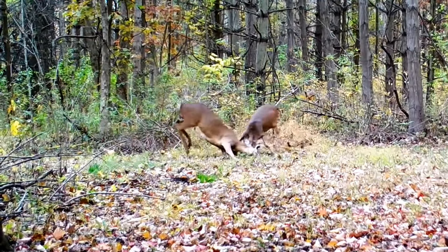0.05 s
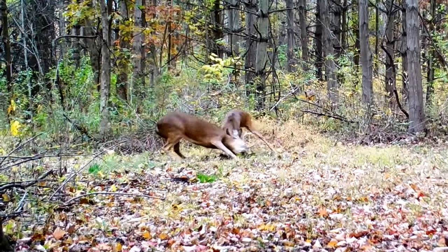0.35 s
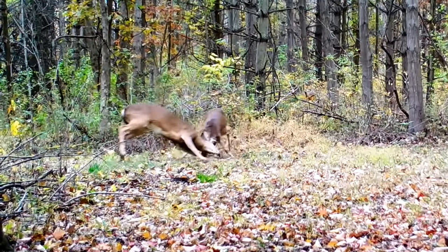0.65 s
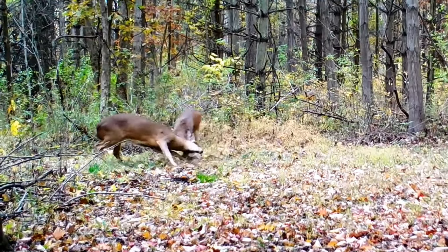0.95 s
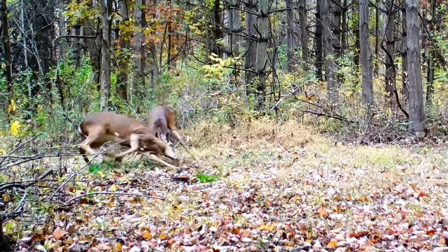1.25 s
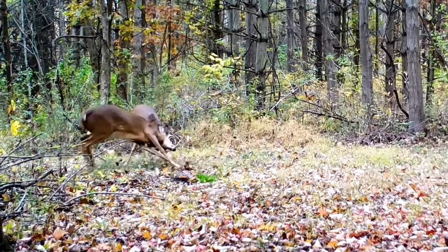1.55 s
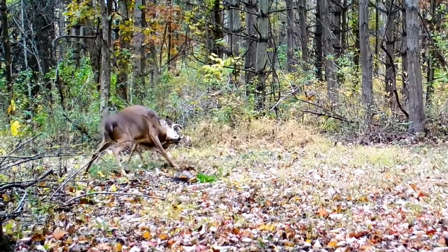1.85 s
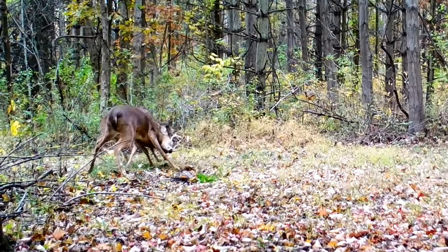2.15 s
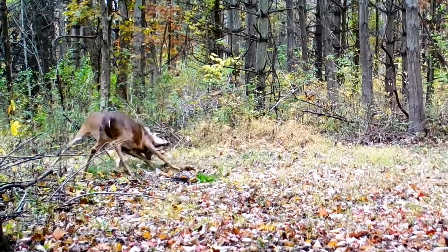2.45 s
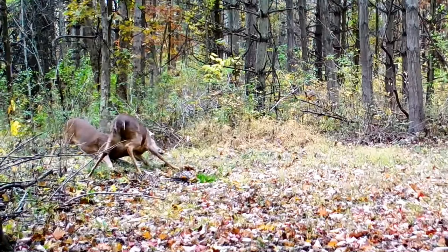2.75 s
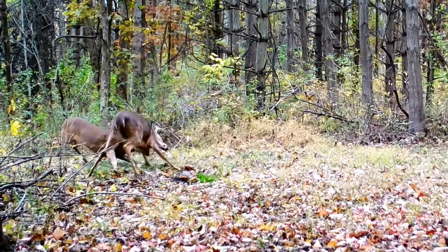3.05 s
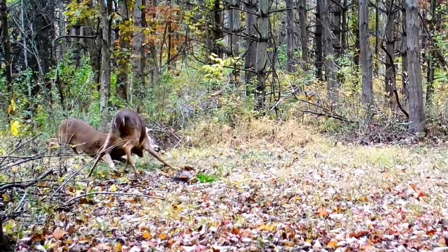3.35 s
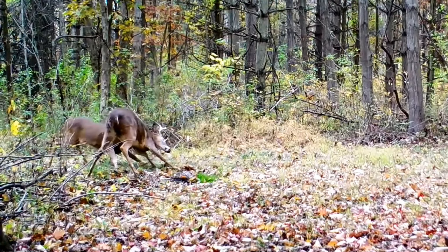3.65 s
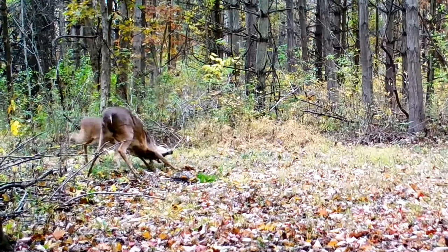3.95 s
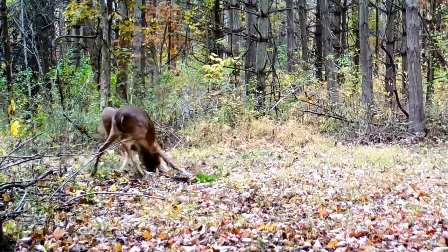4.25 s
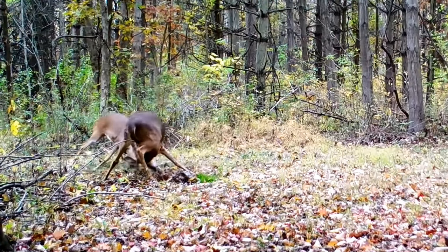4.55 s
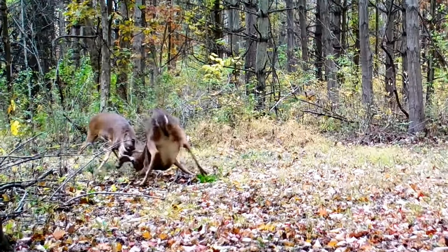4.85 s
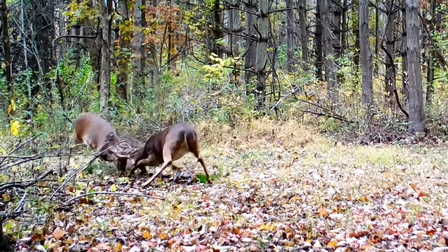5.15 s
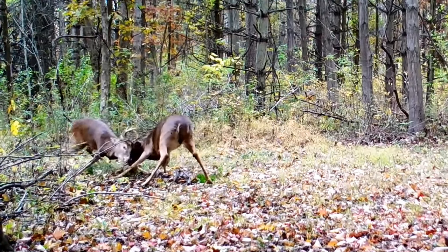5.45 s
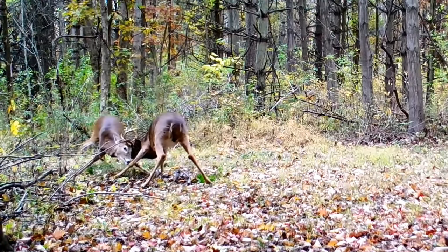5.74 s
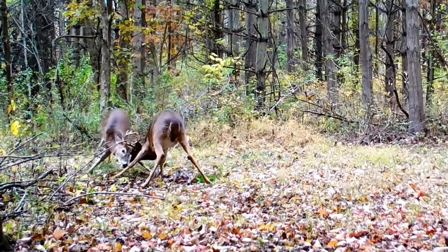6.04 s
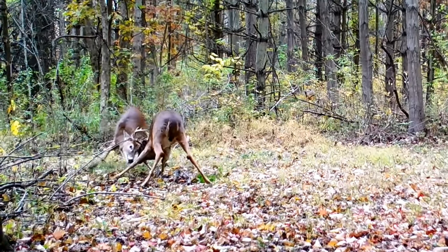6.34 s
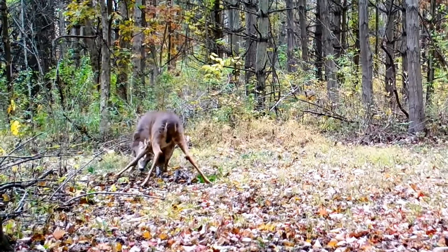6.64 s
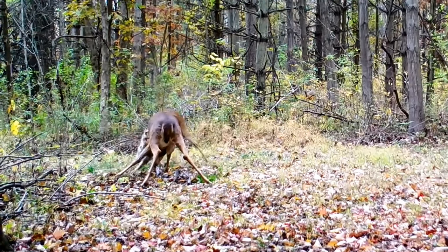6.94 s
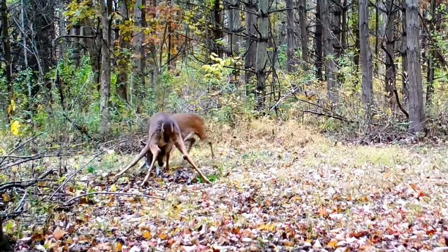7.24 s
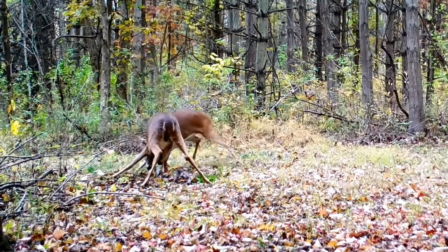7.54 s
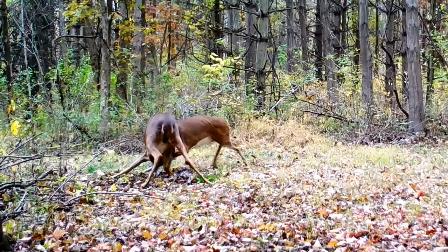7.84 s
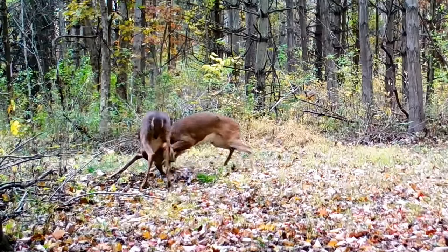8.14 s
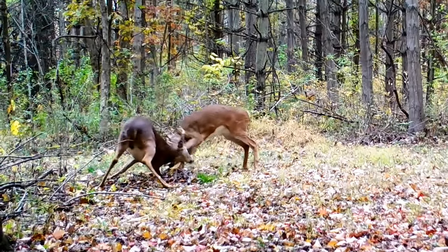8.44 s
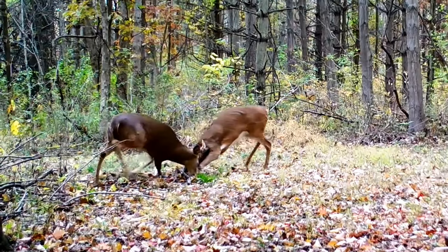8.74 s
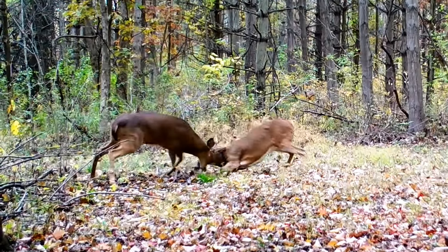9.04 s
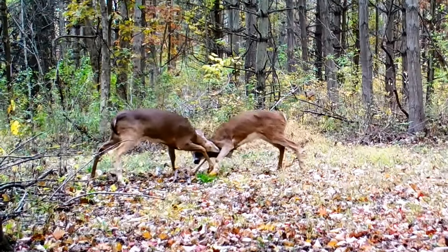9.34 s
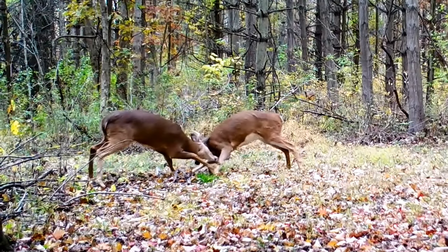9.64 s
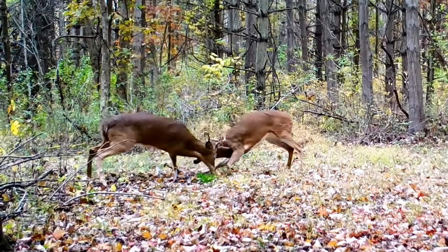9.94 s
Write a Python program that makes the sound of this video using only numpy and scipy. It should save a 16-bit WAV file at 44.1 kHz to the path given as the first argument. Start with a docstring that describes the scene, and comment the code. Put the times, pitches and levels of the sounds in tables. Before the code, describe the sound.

Dry leaves rustle and crunch continuously as two fighting deer shove each other in a wood. Hooves thump on soil and locked antlers tap and clack, breaking into a sharp flurry midway and another at the close. Behind them a far road rumbles, one engine fades and a lower hum grows. The microphone gives a dull sound with a faint hiss, and only the hardest knocks keep a bright snap.

```python
"""The edge of a quiet wood, where two bucks wrestle in dry leaves.
Their legs plough through the litter, hooves thud on the soil, and locked antlers clack in bursts,
with a faint echo off the trunks. Far off an engine drones and sinks in pitch, a lower hum joins it,
and traffic washes through the trees. The sound is muffled: treble falls away steeply, and only some
loud knocks keep a bright snap, over a faint hiss."""
import sys
import numpy as np
from scipy import signal
from scipy.fft import rfft, irfft, next_fast_len
from scipy.io import wavfile
from scipy.ndimage import uniform_filter1d, minimum_filter1d

SR = 44100
rng = np.random.default_rng(int(sys.argv[2]) if len(sys.argv) > 2 else 0)


def unload_wav(signal):
    """Save mono or channel-first audio to the path in sys.argv[1] as 16-bit WAV at rate SR, clipped to [-1, 1]."""
    wavfile.write(
        sys.argv[1],
        SR,
        np.round(np.clip(np.atleast_2d(signal).T, -1, 1) * 32767).astype(np.int16),
    )


N = 440559
TIME = np.arange(N) / SR

# All levels in the tables are relative.
# rumble of the far road: t/s, level/dB
ROAD_LEVEL = [(0, -28), (1.5, -27.5), (3, -28.5), (5.6, -29), (7.3, -28.5), (8.6, -28.5), (9.99, -27)]
# spectra of road rumble, tyre wash and dry leaves: f/Hz, level/dB
RUMBLE_SPECTRUM = [(12, -11), (24, -9), (42, 0.5), (58, 5), (78, 1), (105, 0.5), (135, -1.5), (170, -3),
                   (215, -11), (290, -16), (450, -24.5), (900, -49.5)]
TYRE_SPECTRUM = [(150, -24.5), (300, -10.5), (430, -6), (600, -2.5), (740, 0.5), (1100, -3), (1450, -10.5),
                 (2000, -15.5), (3200, -20), (5000, -27)]
LEAF_SPECTRUM = [(150, -4), (350, 0.5), (700, -7.5), (1200, 4), (1700, -1), (2300, 3.5), (2650, 0.5),
                 (3150, 4.5), (4000, -3), (6000, 0.5)]
# faint treble hiss with a few high peaks: f/Hz, level/dB
HISS_SPECTRUM = [(3000, -6), (5500, 0.5), (6900, -3), (7800, 5.5), (8500, -5.5), (10500, -8), (11700, 2),
                 (12600, -14), (14500, -18.5), (15600, -9)]
# the far engine fades as it moves off: t/s, fundamental level/dB, octave level/dB
ENGINE_LEVELS = [(0, -16, -18.5), (0.9, -20, -19), (1.8, -15.5, -23.5), (2.9, -15.7, -26.5),
                 (3.6, -15.5, -19.5), (4.3, -19.5, -27), (4.7, -16.5, -26.5), (5.2, -20, -30),
                 (6.1, -23, -24), (7.1, -21.5, -36), (8.1, -23, -40), (8.9, -29, -32), (9.99, -33.5, -32)]
# its sinking fundamental: t/s, f/Hz
ENGINE_GLIDE = [(0, 94.5), (2, 93.1), (4, 91.3), (6, 89.7), (8, 88.3), (10, 86)]
# hum of a second, lower engine: t/s, level/dB
HUM_LEVEL = [(0, -29), (1, -38), (3.5, -38.5), (4.7, -43), (5.2, -27.5), (6.7, -23.5), (7.4, -18.5),
             (8.6, -20), (9.99, -19)]
# feet never stop shuffling in the litter: t/s, level/dB
SHUFFLE_LEVEL = [(0, -34.5), (1.8, -35.5), (3, -38.5), (4, -37), (5, -30), (5.75, -43.5), (6.5, -38),
                 (7.4, -41), (8, -35), (9.99, -35)]
# a leg ploughs through the leaves: hardest push t/s, length/s, level/dB
LEG_SCUFFS = [(0.109, 0.12, -30.5), (0.326, 0.32, -31.5), (0.707, 0.22, -26.5), (0.915, .22, -28),
              (1.294, 0.4, -24), (1.578, .07, -22.5), (1.657, 0.18, -30.5), (2.1, .2, -37),
              (2.485, 0.11, -35.5), (2.732, .14, -30.5), (3.094, .07, -35), (4.375, .3, -28.5),
              (4.507, .07, -30), (4.679, 0.22, -30), (4.818, .17, -23.5), (5.201, 0.4, -29.5),
              (5.513, 0.2, -28.5), (6.68, 0.12, -31.5), (6.875, 0.088, -34.5), (7.101, 0.053, -30),
              (7.162, .08, -33), (7.808, .08, -29), (8.12, .25, -37.5), (8.348, 0.055, -30.5),
              (8.582, .08, -28.5), (8.717, 0.1, -28.5), (8.894, 0.12, -28.5), (9.03, .14, -27),
              (9.204, 0.12, -25.5), (9.33, .07, -28), (9.592, .14, -29.5), (9.912, 0.13, -25.5)]
# hooves stamp on soil: t/s, level/dB, f/Hz
HOOF_STAMPS = [(0.701, -16.5, 221), (1.144, -10, 300), (2.764, -16, 409), (2.824, -21, 222),
               (4.677, -16.5, 223), (4.766, -17, 270), (5.298, -18, 370), (7.084, -23.5, 294),
               (9.896, -17.5, 428), (9.911, -13.5, 510)]
# the soil rings under a hoof: ratio to the stamp's pitch, level/dB, t60/s
SOIL_RESONANCES = [(0.601, -2.5, 0.029), (1.0, 2, 0.027), (1.35, -8.5, 0.025)]
# the antlers ring: f/Hz, level/dB
ANTLER_RESONANCES = [(880, -7.5), (1270, -2.5), (1610, 1.5), (1900, 5), (2310, 2.5), (2590, -4), (2860, -1),
                     (3140, 3), (3540, 1), (3950, -8), (4490, 3.5)]
# antlers knock together: t/s, level/dB, favoured f/Hz, fall-off around it/(dB per octave), snap level/dB
ANTLER_CLACKS = [(0.313, -22.5, 2020, 11, -82), (1.132, -20.5, 2550, 5.5, -80),
                 (1.146, -10.5, 2400, 14, -77), (1.304, -20, 3400, 16, -80), (2.7576, -25, 1780, 12, -79),
                 (4.012, -20, 2140, 12, -86), (5.0915, -19.5, 2700, 11, -80),
                 (5.1373, -13.5, 2050, 17, -80), (5.16, -18, 2000, 10, -70), (5.1899, -7, 2460, 16, -21),
                 (5.222, -9.5, 2370, 16, -23), (5.241, -22, 2790, 12, -50), (5.2685, -9, 3250, 21, -25),
                 (5.276, -11, 2900, 7, -27), (5.2984, -12, 2640, -1, -34), (5.54, -19.5, 2310, 11, -76),
                 (6.6927, -22, 2550, 5.5, -72), (7.0838, -14, 3900, 3, -85), (7.0883, -19.5, 3900, 1, -84),
                 (7.7997, -19, 3200, 13.5, -80), (8.586, -25, 1740, 8, -80), (8.913, -24, 3040, 13, -82),
                 (9.184, -17, 2760, 35, -80), (9.3243, -20.5, 2200, 18, -85), (9.8558, -9, 1960, 17, -78),
                 (9.895, -12.5, 2130, 14, -80), (9.9034, -6, 1860, 7, -34), (9.9088, -9, 2000, 13, -21),
                 (9.9135, -7, 2250, 17, -19), (9.9338, -21, 2170, 16, -54)]


def from_db(db):
    """Decibels to gain."""
    return 10 ** (np.asarray(db) / 20)


def rms_one(x):
    """Scale to an rms of 1."""
    return x / np.sqrt(np.mean(x ** 2) + 1e-20)


def in_time(rows):
    """Each column of a curve at every sample."""
    times, *columns = np.transpose(rows)
    return [np.interp(TIME, times, column) for column in columns]


def drift(hz):
    """Slow random wander with a spread of 1, drawn every 40 samples."""
    pole = np.exp(-80 * np.pi * hz / SR)
    slow = signal.lfilter([1], [1, -2 * pole, pole * pole], rng.standard_normal(N // 40 + 2002))[2000:]
    return np.interp(np.arange(N) / 40, np.arange(len(slow)), rms_one(slow))


def butter(x, hz, kind, order=2):
    """Causal low-, high- or band-pass."""
    return signal.sosfilt(signal.butter(order, hz, kind, fs=SR, output="sos"), x + 1e-18)


def coloured(x, spectrum):
    """Shape a signal with a spectrum; rms 1."""
    size = next_fast_len(N)
    hz, level_db = np.transpose(spectrum)
    bins = np.maximum(np.fft.rfftfreq(size, 1 / SR), 1)
    gain = from_db(np.interp(np.log(bins), np.log(hz), level_db))
    return rms_one(irfft(rfft(x, size) * gain, size)[:N])


def ring(clicks, hz, t60):
    """A unit click sets a sine of height 1 ringing."""
    r, w = from_db(-60 / (t60 * SR)), 2 * np.pi * hz / SR
    return signal.lfilter([0, np.sin(w)], [1, -2 * r * np.cos(w), r * r], clicks + 1e-18)


def dying(t, t60):
    """Decay by 60 dB in t60 seconds."""
    return np.exp(-np.log(1000) * t / t60)


def add(out, start_s, sound):
    """Mix a sound in at a given time."""
    at = max(round(start_s * SR), 0)
    out[at:at + len(sound)] += sound[:max(N - at, 0)]


def traffic(rumble_db=6.5, wash_db=-27.0, swell_db=0.26):
    """A far road through the trees: low rumble and a smooth, steady wash of tyres."""
    road_db, = in_time(ROAD_LEVEL)
    rumble = from_db(rumble_db + road_db) * coloured(rng.standard_normal(N), RUMBLE_SPECTRUM)
    wash = from_db(wash_db + swell_db * drift(2)) * coloured(rng.standard_normal(N), TYRE_SPECTRUM)
    return rumble + wash


def engines(hum_hz=71.4, waver_db=1.58, wobble_rad=0.1):
    """Only the lowest engine orders carry this far; moving air makes them waver in level and phase."""
    hz, = in_time(ENGINE_GLIDE)
    fundamental_db, octave_db = in_time(ENGINE_LEVELS)
    hum_db, = in_time(HUM_LEVEL)
    turn, hum_turn = 2 * np.pi * np.cumsum(hz) / SR, 2 * np.pi * hum_hz * TIME
    out = np.zeros(N)
    for phase, db in [(turn, fundamental_db - 0.5), (2 * turn, octave_db - 1.5), (hum_turn, hum_db)]:
        amplitude = np.sqrt(2) * from_db(db + waver_db * drift(3.7))
        out += amplitude * np.sin(phase + wobble_rad * drift(0.8))
    return out


def trunks(x, echo_db=-17, t60=0.47):
    """The trees around the fight scatter a faint, quickly dying echo."""
    t = TIME[:SR // 2]
    scatter = rng.standard_normal(len(t)) * dying(t, t60) * (t > .006)
    return x + from_db(echo_db) * signal.fftconvolve(x, scatter / np.linalg.norm(scatter))[:N]


def scuffling(rise_share=.46):
    """Rustle level in dB: each push of a leg swells and fades in a bell curve, on top of the shuffling."""
    shuffle_db, = in_time(SHUFFLE_LEVEL)
    power = from_db(shuffle_db) ** 2
    for push_s, length, db in LEG_SCUFFS:
        near = slice(*np.searchsorted(TIME, [push_s - 2 * length, push_s + 2 * length]))
        t = TIME[near] - push_s
        width = length * np.where(t < 0, rise_share, 1 - rise_share)
        power[near] += (from_db(db) * np.exp(-(t / width) ** 2)) ** 2
    return 10 * np.log10(power)


def leaves(level_db, breaks_per_s=1500, size_db=2, clump_db=3, flutter_db=2, crackle_db=-5, swish_db=3):
    """Leaves break in clumps of ticks over the swish of leaf on leaf; harder scuffling breaks more."""
    effort = from_db(level_db - level_db.mean())
    clumps = drift(25)
    breaks = rng.random(N) < breaks_per_s * effort * from_db(clump_db * clumps) / SR
    sizes = from_db(size_db * np.minimum(rng.exponential(1, N), 4))
    ticks = breaks * sizes * rng.choice([-1, 1], N) / np.sqrt(effort)
    pitches = np.geomspace(1200, 4600, 14)
    pitch_index = rng.integers(0, len(pitches), N)
    # each fragment rings for only a few cycles
    fragments = sum(ring(ticks * (pitch_index == k), hz, 6.8 / hz) * hz for k, hz in enumerate(pitches))
    crackle = coloured(fragments, LEAF_SPECTRUM)
    swish = coloured(rng.standard_normal(N), LEAF_SPECTRUM) * from_db(flutter_db * clumps)
    return from_db(level_db) * (from_db(crackle_db) * crackle + from_db(swish_db) * swish)


def hooves(thud_db=2.5, crumble_db=-12, crumble_t60=0.22):
    """A stamp is a short dull thud, followed by crumbling soil."""
    out, t = np.zeros(N), TIME[:SR // 5]
    for start_s, level_db, hz in HOOF_STAMPS:
        thud = sum(from_db(db) * np.sin(2 * np.pi * hz * ratio * t) * dying(t, t60)
                   for ratio, db, t60 in SOIL_RESONANCES)
        crumble = rms_one(butter(rng.standard_normal(len(t)), [220, 650], "band")) * dying(t, crumble_t60)
        add(out, start_s, from_db(level_db) * (from_db(thud_db) * thud + from_db(crumble_db) * crumble))
    return out


def tine_taps(scuffle_db, per_s=3.0, over_rustle_db=1, spread_db=1.3, hz=2300, octaves=0.36, falloff=10.5):
    """Rows of light, random antler contacts: the tines touch more often and harder in hard scuffling."""
    effort = from_db(scuffle_db - scuffle_db.mean())
    moments = np.flatnonzero(rng.random(N) < per_s * effort / SR)
    levels_db = scuffle_db + over_rustle_db
    return [(TIME[i], levels_db[i] + spread_db * force, hz * 2 ** (octaves * place), falloff)
            for i, (force, place) in zip(moments, rng.standard_normal((len(moments), 2)))]


def antler_snaps(gain_db=1, rise_s=0.0017, t60=0.0078, tail_db=-36, tail_t60=.09):
    """Some loud knocks carry a thin, very short snap of treble with a faint tail."""
    out, t = np.zeros(N), TIME[:SR // 10]
    envelope = (1 - np.exp(-t / rise_s)) * (dying(t, t60) + from_db(tail_db) * dying(t, tail_t60))
    for start_s, *_, snap_db in ANTLER_CLACKS:
        add(out, start_s, from_db(snap_db + gain_db) * rng.standard_normal(len(t)) * envelope)
    return 2 * butter(out, [5700, 8400], "band")


def antlers(contacts, t60_at_0_db=.018, doubling_db=40.5, grind_db=-15, grind_t60=0.048):
    """Where the antlers meet decides which modes ring; locked, they damp each other in milliseconds."""
    out, t = np.zeros(N), TIME[:SR // 10]
    hz, mode_db = np.transpose(ANTLER_RESONANCES)[:, :, None]
    for start_s, level_db, favoured_hz, falloff, *_ in contacts:
        t60 = t60_at_0_db * 2 ** (level_db / doubling_db)  # a harder knock rings longer
        phase = 2 * np.pi * rng.random(hz.shape)
        detune = 1 + 0.0072 * rng.standard_normal(hz.shape)
        strength = from_db(mode_db - falloff * np.abs(np.log2(hz / favoured_hz)))
        knock = np.sum(strength * np.sin(2 * np.pi * hz * detune * t + phase), axis=0) * dying(t, t60)
        knock /= np.std(knock[t < .003])  # the first 3 ms set the level
        grind = rms_one(butter(rng.standard_normal(len(t)), [700, 4500], "band")) * dying(t, grind_t60)
        add(out, start_s, from_db(level_db) * (knock + from_db(grind_db) * grind))
    return butter(out, 500, "high")


def muffle(x):
    """The treble falls away steeply, in two stages."""
    return butter(butter(x, hz=3630, kind="low", order=9), hz=5020, kind="low", order=12)


def limiter(x, size=33):
    """Duck smoothly for a millisecond or two around any peak that would pass full scale."""
    gain = minimum_filter1d(1 / np.maximum(np.abs(x), 1), 2 * size)
    return x * uniform_filter1d(uniform_filter1d(gain, size), size)


def scene():
    """The far background and the fight, both muffled; only the snaps keep their treble."""
    scuffle_db = scuffling()
    rustle = leaves(scuffle_db)
    background = engines() + traffic()
    snaps = antler_snaps()
    blows = trunks(hooves() + antlers(ANTLER_CLACKS + tine_taps(scuffle_db)))
    return (muffle(background + rustle + blows) + snaps)[None]


def record(dry, hiss_db=-77, top_cut_hz=15700):
    """Faint treble hiss, a peak limiter and a steep top cut."""
    hiss = from_db(hiss_db) * coloured(rng.standard_normal(N), HISS_SPECTRUM)
    return butter(limiter(dry + hiss), top_cut_hz, "low", order=16)


dry = scene()
out = record(dry)
unload_wav(out)
```